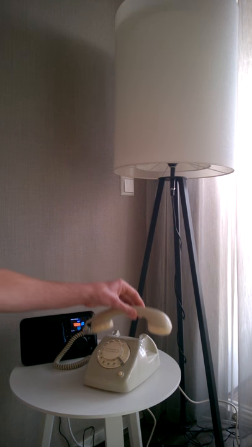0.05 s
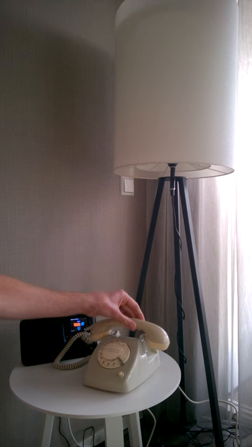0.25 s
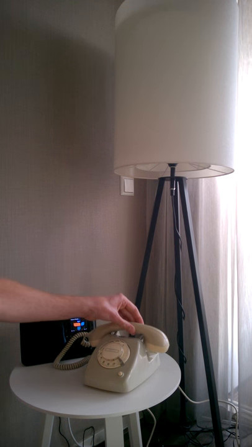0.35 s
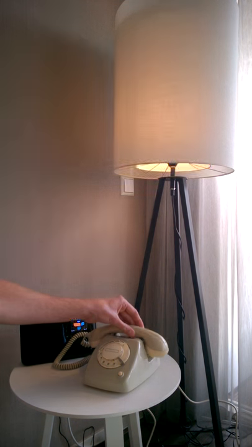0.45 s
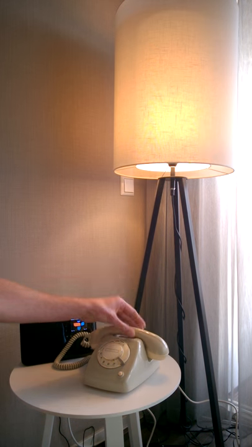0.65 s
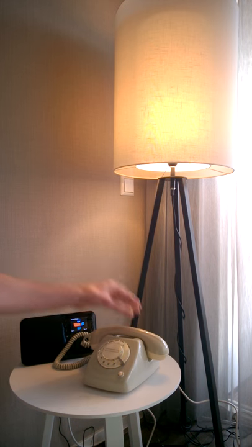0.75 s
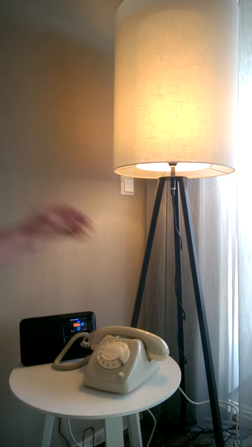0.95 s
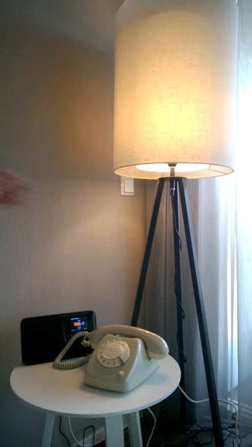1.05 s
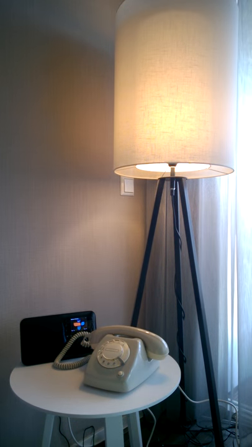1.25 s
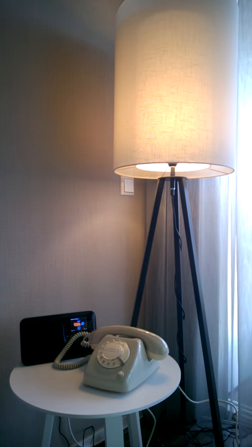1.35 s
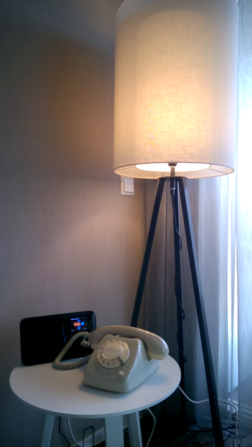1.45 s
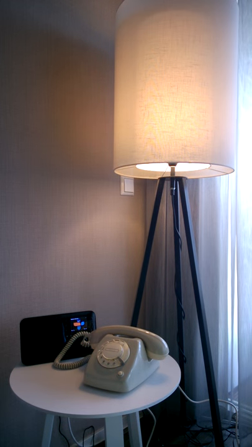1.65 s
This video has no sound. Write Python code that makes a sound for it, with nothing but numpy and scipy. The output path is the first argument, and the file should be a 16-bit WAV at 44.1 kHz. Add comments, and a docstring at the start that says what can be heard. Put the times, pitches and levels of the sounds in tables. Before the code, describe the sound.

A telephone handset is hung up, heard close in a quiet room. One end knocks on the hollow plastic housing, the other clacks onto the cradle, rocks into its seat and ends with a soft knock over faint hiss.

```python
"""A quiet room, a dial telephone on a small table, one microphone close by. A plastic handset is set
down: one end lands with a hollow knock of the housing, the other clacks onto the cradle and pushes
down the hook switch. It rocks, scrapes and rattles into its seat and gives a last soft knock as the
hand lets go. Each contact has a short room tail; behind it lie still air, a low hum and a faint hiss."""
import sys
import numpy as np
from scipy import signal
from scipy.fft import rfft, irfft, next_fast_len
from scipy.io import wavfile
from scipy.ndimage import map_coordinates

SR = 44100
rng = np.random.default_rng(int(sys.argv[2]) if len(sys.argv) > 2 else 0)


def waveform_to_disk(signal):
    """Save audio, clipped to [-1, 1], as 16-bit WAV at the path in sys.argv[1]."""
    frames = np.transpose(np.atleast_2d(signal))
    scaled = np.clip(frames, -1, 1) * 32767
    samples = np.round(scaled).astype(np.int16)
    wavfile.write(sys.argv[1], SR, samples)


N = 74970
TIME = np.arange(N) / SR


def amp(db):
    """Decibels to gain."""
    return 10 ** (np.asarray(db) / 20)


def unit(x):
    """Scale to rms 1."""
    return x / np.sqrt(np.mean(x ** 2) + 1e-20)


def along(points, hz):
    """Read (f/Hz, value) points on a log axis."""
    f, value = np.transpose(points)
    return np.interp(np.log(hz + 1), np.log(f + 1), value)


def filtered(x, response):
    """Weight the spectrum of x by response(hz)."""
    size = next_fast_len(N + SR // 2)
    return irfft(rfft(x, size) * response(np.fft.rfftfreq(size, 1 / SR)), size)[:N]


def noise(spectrum, tilt_db=0):
    """Coloured noise of rms 1, tilted by tilt_db per octave."""
    white = rng.standard_normal(N)
    return unit(filtered(white, lambda hz: amp(along(spectrum, hz) + tilt_db * np.log2(hz + 1))))


def fade(t, t60):
    """Exponential decay, 60 dB in t60 seconds."""
    return amp(-60 * t / np.maximum(t60, 1e-3))


def ring(modes, free, attack_s=0.00079, scatter_db=3.5, detune=0.0131):
    """Struck modes: the point of contact varies their level and pitch; free below 1 damps them."""
    t = np.arange(SR * 3 // 4) / SR
    tone = np.zeros(len(t))
    for hz, db, t60 in modes:
        louder, higher = rng.standard_normal(2)
        envelope = amp(db + scatter_db * louder) * fade(t, min(free, 1) * t60)
        tone += envelope * np.sin(2 * np.pi * hz * (1 + detune * higher) * t)
    return np.pad(tone * (1 - np.exp(-t / attack_s)), (0, N - len(t)))


# Spectrum of the still room (f/Hz, level/dB)
AIR_SPECTRUM = [(12, -35.5), (20, 1), (55, 4), (70, -12), (107, -7), (150, -12), (182, -5.5), (209, -11),
                (247, -16.5), (366, -21.5), (639, -24.5), (777, -26), (894, -24.5), (15900, -45)]
def room_air():
    """Room tone: still air, mostly deep rumble."""
    return amp(-60) * noise(AIR_SPECTRUM)


# Partials of the hum (f/Hz, level/dB)
HUM_PARTIALS = [(49, -57.5), (100, -71.5), (180, -77), (243, -72)]
def hum():
    """A low hum in the room, each partial wavering in level and phase."""
    def waver(rate_hz):
        return map_coordinates(rng.standard_normal(64), [TIME * rate_hz], mode="wrap")
    return sum(amp(db + 3 * waver(7.96)) * np.sin(2 * np.pi * hz * TIME + 1.06 * waver(7.36))
               for hz, db in HUM_PARTIALS)


# Spectrum of the hiss (f/Hz, level/dB) and its course (t/s, level/dB)
HISS_SPECTRUM = [(200, -19.5), (900, 3), (2000, -2.5), (5500, -2.5), (8000, -12), (15000, -18.5)]
HISS_COURSE = [(0, -65), (.06, -69), (.2, -74), (1.0, -73.5), (1.35, -74.5), (1.57, -66.5), (1.7, -68.5)]
def hiss():
    """A faint hiss that ebbs and swells."""
    return amp(np.interp(TIME, *np.transpose(HISS_COURSE))) * noise(HISS_SPECTRUM)


# Decay of the room (f/Hz, t60/s) and its tail against the direct sound (f/Hz, level/dB)
ROOM_DECAY = [(100, 0.15), (500, 0.42), (2000, 0.56), (4500, .48), (8000, 0.25), (15000, 0.22)]
ROOM_TAIL = [(100, 4), (500, -6.5), (1200, -4.5), (4000, -8.5), (8000, -11), (15000, -10)]
def room(direct, build_s=0.0036):
    """The microphone hears the direct sound, then a diffuse tail that lasts longest in the mids."""
    hz, t, spectra = signal.stft(rng.standard_normal(SR * 3 // 4), SR, nperseg=256)
    decay = fade(t, along(ROOM_DECAY, hz)[:, None]) * (1 - np.exp(-t / build_s))
    decay /= np.sqrt(np.mean(decay ** 2, axis=1, keepdims=True))
    colour = amp(along(ROOM_TAIL, hz))[:, None]
    tail = signal.istft(spectra * decay * colour, SR, nperseg=256)[1]
    return direct + signal.fftconvolve(direct, tail / np.sqrt(len(tail)))[:N]


# Spectrum of hard plastic edges (f/Hz, level/dB)
EDGE_SPECTRUM = [(200, -26.5), (900, -17), (1800, 6), (2700, 5), (3500, 7.5), (6500, 2.5), (9000, -8),
                 (12000, -21), (16000, -33)]
def edge_noise(tilt_db=0):
    """Dense, bright ringing of plastic edges, heard in taps, scrapes and clicks."""
    return noise(EDGE_SPECTRUM, tilt_db)


# Modes of the held handset (f/Hz, level/dB, t60/s) and its taps (t/s, ring level/dB, edge level/dB)
GRIP_MODES = [(538, -14, 0.21), (800, -3, 0.074), (1042, -3.5, 0.11), (1230, -2.5, 0.027),
              (1672, -6.5, 0.069)]
GRIP_TAPS = [(.002, -49, -89), (0.1008, -46.5, -59.5)]
def taps():
    """The handset shifts in the hand before it lands, with faint damped taps."""
    out = np.zeros(N)
    for at_s, ring_db, edge_db in GRIP_TAPS:
        start = round(at_s * SR)
        body = amp(ring_db) * ring(GRIP_MODES, free=0.56)
        edge = amp(edge_db) * edge_noise() * fade(TIME, t60=0.021)
        out[start:] += (body + edge)[:N - start]
    return room(out)


# Slides along the cradle (t/s, length/s, level/dB, tilt/dB per octave)
CRADLE_SLIDES = [(.237, .027, -53, 3), (.466, .055, -49, .5), (.557, .025, -52, 2)]
def slides(grains_per_s=900, rough_db=5):
    """Short grainy scrapes of plastic on plastic."""
    out = np.zeros(N)
    for at_s, length_s, db, tilt_db in CRADLE_SLIDES:
        progress = np.clip((TIME - at_s) / length_s, 0, 1)
        stroke = np.sqrt(np.abs(np.sin(np.pi * progress)))
        grains = np.interp(TIME * grains_per_s, np.arange(N), rng.standard_normal(N))
        out += amp(db) * stroke * unit(amp(rough_db * grains) * edge_noise(tilt_db))
    return room(out)


def chatter(free, free_t60_s, free_hold_s=0.0031):
    """Envelope of loose parts that chatter briefly, then die away; damping shortens both stages."""
    damped_time = TIME / max(free, 0.1)
    return fade(np.maximum(damped_time - free_hold_s, 0), free_t60_s)


# Modes of the hook switch (f/Hz, level/dB, t60/s)
SWITCH_MODES = [(2960, -15.5, 0.17), (4290, -28, 0.48), (5145, -16, 0.068), (6000, -16, 0.095),
                (7130, -38, 0.17)]
def switch_click(free, tilt_db):
    """The hook switch rings high while hard edges click."""
    modes = amp(-4) * ring(SWITCH_MODES, free)
    return modes + amp(-4.5) * edge_noise(tilt_db) * chatter(free, free_t60_s=0.21)


# Plastic shell and cradle: modes (f/Hz, level/dB, t60/s) and dense ringing (f/Hz, level/dB)
SHELL_MODES = [(1012.5, -7.5, 0.1), (1087.6, -7.5, 0.28), (1146, -4.5, 0.15), (1263, -7, 0.17),
               (1351, -14, 0.2), (1490, -13, 0.19), (1637, -20, 0.47), (1793, -11, 0.26), (1880, -18, 0.54),
               (2450, -11, 0.13), (3103, -16.5, 0.21), (3650, -17.5, 0.48)]
SHELL_SPECTRUM = [(60, -46), (290, -38), (490, 5), (680, -13), (900, -7.5), (1100, 0), (1450, -9),
                  (1800, -2.5), (2150, -19.5), (4000, -17.5), (8000, -41), (16000, -78)]
def shell_clack(free):
    """The shell clacks: distinct modes over dense, quickly damped ringing."""
    modes = amp(-3.5) * ring(SHELL_MODES, free)
    return modes + amp(-0.5) * noise(SHELL_SPECTRUM) * chatter(free, free_t60_s=0.18)


# Modes of the housing on the table (f/Hz, level/dB, t60/s)
HOUSING_MODES = [(87.4, -25, 0.21), (232, -23.5, 0.12), (345.6, -29.5, 0.57), (380.6, -15.5, 0.29),
                 (452.6, -1.5, 0.17), (470, -5.5, 0.13), (525.6, -1.5, 0.15), (560.3, -10.5, 0.22),
                 (589, -20.5, 0.54), (778, -18.5, 0.23), (836.7, -19, 0.2)]
def housing_thump(free):
    """The hollow housing answers a blow with low modes and a soft onset."""
    return ring(HOUSING_MODES, free, attack_s=0.0036, scatter_db=1)


# Handset meeting cradle (t/s, thump level/dB, clack level/dB, click level/dB,
# click tilt/dB per octave, free ring: 1 = undamped, less when pressed or grazed)
CRADLE_CONTACTS = [ (0.2226, -65, -60.5, -46, -1, 0.85), (0.2306, -18.5, -31, -53, 13, 1),
                   (0.2381, -50, -33, -36.5, -6.5, 0.75), (0.417, -58, -43.5, -57, 8, 0.31),
                   (0.4328, -32, -34, -36.5, 1, 0.65), (0.4367, -26, -26, -27.5, 4.5, 0.56),
                   (0.4480, -50, -52, -28, 6, -1), (0.4625, -40.5, -46, -29.5, 4, 0.39),
                   (0.497, -62, -73, -39, 0.5, 1), (0.525, -25.5, -29.5, -39.5, -3.5, 0.43),
                   (0.5476, -74, -58, -41, 7.5, 0.51), (0.5593, -36.5, -38.5, -52, 5.5, 0.5),
                   (0.5884, -32.5, -41.5, -58, -15, 0.42), (0.6037, -29, -46.5, -62, -16.5, .55),
                   (0.6465, -58, -74, -53.5, -4.5, 0.63), (0.6845, -70, -47, -56, 1, 0.54),
                   (0.7559, -69.5, -61.5, -67, 0, 0.88), (0.7889, -32.5, -46.5, -47.5, -6.5, 0.88),
                   (1.2894, -88, -62, -57, 5.5, 0.14), ]
def handset(rise_s=0.0003):
    """The handset lands and rocks into its seat; each blow sounds housing, shell and switch."""
    out = np.zeros(N)
    rise = 1 - np.exp(-TIME / rise_s)
    for at_s, thump_db, clack_db, click_db, tilt_db, free in CRADLE_CONTACTS:
        start = round(at_s * SR)
        thump = amp(thump_db) * housing_thump(free)
        clack = amp(clack_db) * shell_clack(free)
        click = amp(click_db) * switch_click(free, tilt_db)
        out[start:] += room(rise * (thump + clack + click))[:N - start]
    return out


def scene():
    """The telephone in front, the quiet room behind, in mono."""
    return (taps() + handset() + slides() + hum() + hiss() + room_air())[None]


def record(dry):
    """The microphone keeps nothing above 15.8 kHz."""
    return np.array([filtered(channel, lambda hz: hz < 15800) for channel in dry])


dry = scene()
out = record(dry)
waveform_to_disk(out)
```